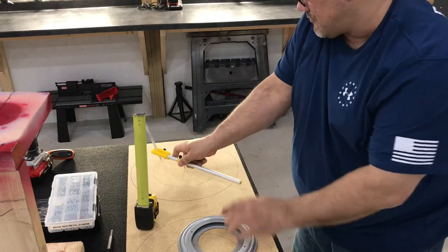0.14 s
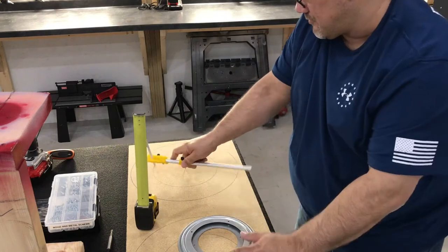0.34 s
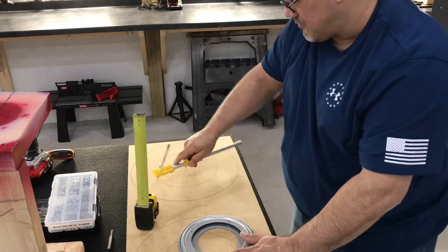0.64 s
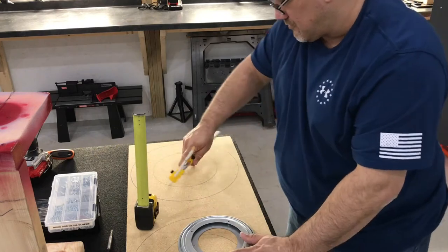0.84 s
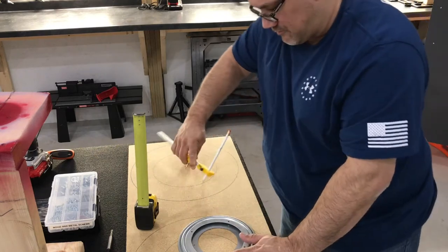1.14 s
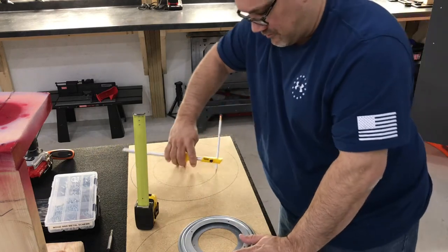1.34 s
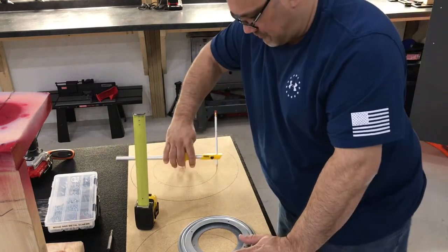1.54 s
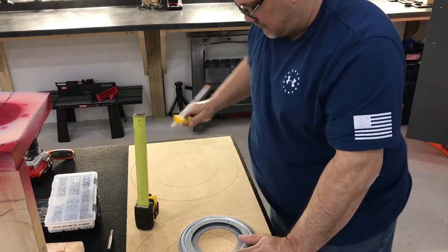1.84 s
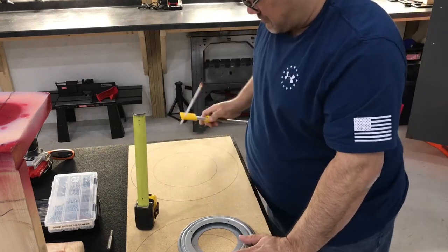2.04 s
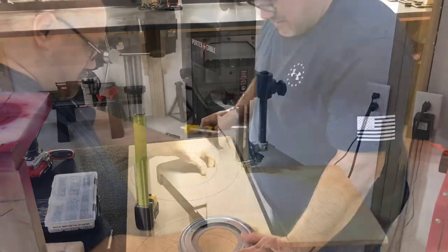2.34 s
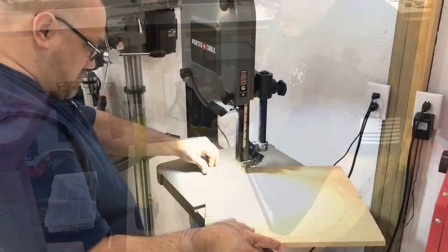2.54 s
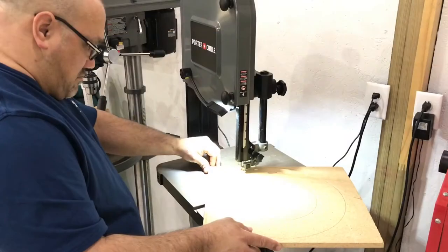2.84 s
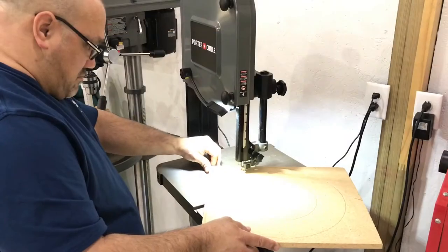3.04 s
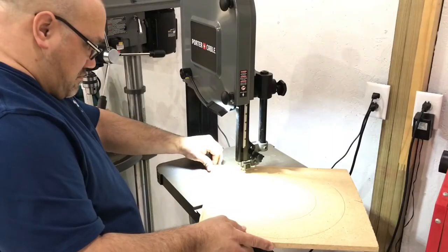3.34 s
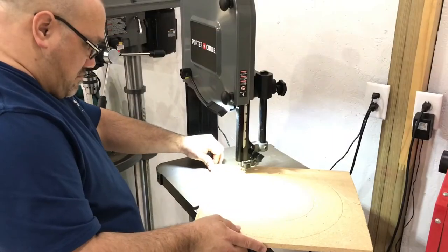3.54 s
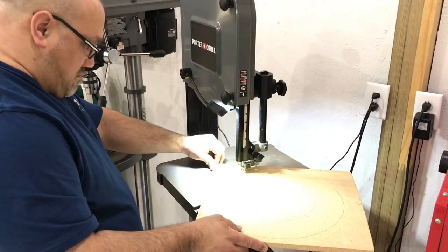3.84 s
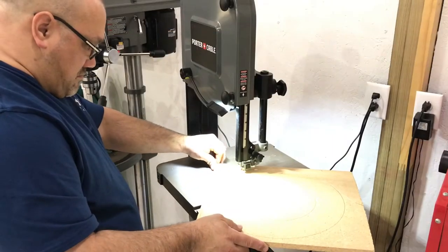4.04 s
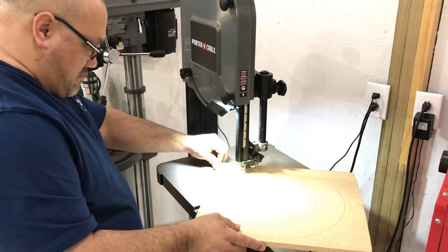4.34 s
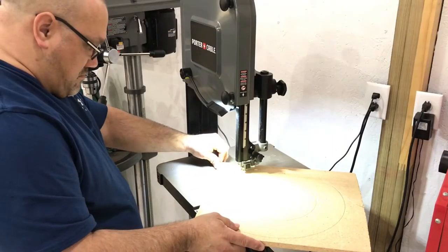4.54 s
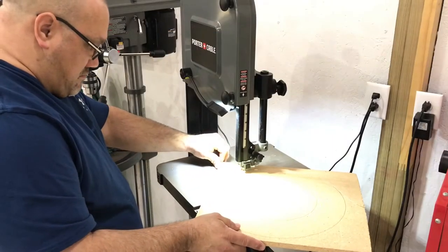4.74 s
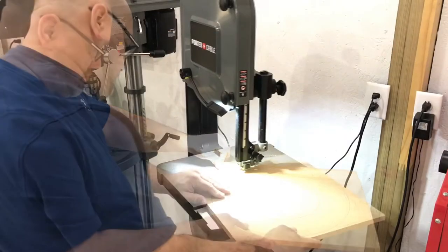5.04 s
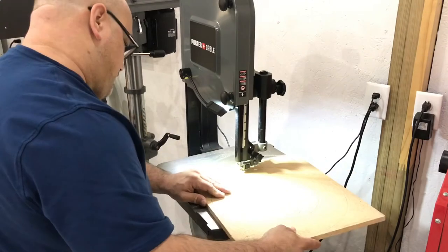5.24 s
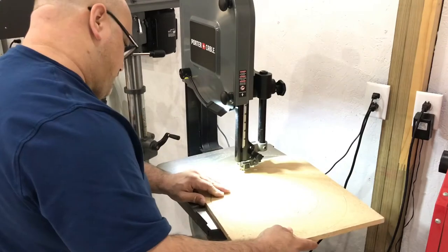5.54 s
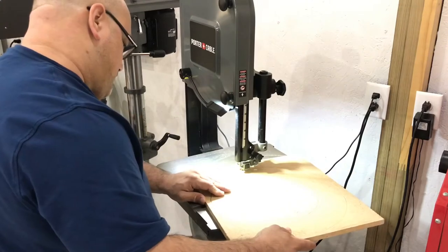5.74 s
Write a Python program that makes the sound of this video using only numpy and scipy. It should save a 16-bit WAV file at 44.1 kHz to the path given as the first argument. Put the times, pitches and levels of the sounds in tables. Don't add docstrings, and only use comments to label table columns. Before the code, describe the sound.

Faint pencil scratching on plywood over soft room rumble, then a loud band saw fades in, humming, whining and hissing steadily through a board.

```python
import sys
import numpy as np
from scipy import signal
from scipy.fft import rfft, irfft
from scipy.io import wavfile

SR = 44100
rng = np.random.default_rng(int(sys.argv[2]) if len(sys.argv) > 2 else 0)


def pcm_store(signal):
    levels = np.round(np.clip(np.atleast_2d(signal), -1, 1) * 32767)
    wavfile.write(sys.argv[1], SR, levels.astype(np.int16).T)


def ratio(d):
    e = np.asarray(d, float) / 20
    return 10 ** e


N = 259308
BELT_HZ = 335.05


def rms_one(x):
    return x / np.sqrt(np.mean(x ** 2) + 1e-20)


def in_time(rows):
    s, *columns = np.transpose(rows)
    return [np.interp(np.arange(N) / SR, s, c) for c in columns]


def swells(rows):
    t = np.arange(0, N + 64, 64) / SR
    s, length, *columns = np.transpose(rows)
    bells = np.exp(-0.5 * ((t[:, None] - s) / length) ** 2)
    return [np.interp(np.arange(N) / SR, t, bells @ c) for c in columns]


def drift(rate):
    thin = 40
    r = np.exp(-2 * thin * np.pi * rate / SR)
    noise = rng.standard_normal(N // thin + 2002)
    slow = signal.lfilter([1], [1, -2 * r, r * r], noise)[2000:]
    return np.interp(np.arange(N) / thin, np.arange(len(slow)), rms_one(slow))


def coloured(x, spectrum):
    hz, db = np.transpose(sorted(spectrum))
    grid = np.maximum(np.arange(N // 2 + 1) * SR / N, 1)
    gain = ratio(np.interp(np.log(grid), np.log(hz), db))
    return rms_one(irfft(rfft(x) * gain, N))


def resonate(x, modes):
    out = np.zeros(N)
    for k, (hz, width, db) in enumerate(modes):
        r = np.exp(-np.pi * width / SR)
        poles = [1, -2 * r * np.cos(2 * np.pi * hz / SR), r * r]
        ring = signal.lfilter([1, 0, -1], poles, x)
        out += (-1) ** k * ratio(db) * rms_one(ring)
    return out


def stack(turns, orders, flutter_db, rate, smear):
    out = np.zeros(N)
    for k, db in orders:
        level = ratio(db + flutter_db * drift(rate))
        wander = smear * np.sqrt(k) * drift(rate)
        out += level * np.sin(2 * np.pi * (k * turns + rng.random()) + wander)
    return out * np.sqrt(2)


def keep_band(x, low_hz, high_hz):
    size = x.shape[-1]
    grid = np.arange(size // 2 + 1) * SR / size
    return irfft(rfft(x) * (grid >= low_hz) * (grid <= high_hz), size)


def shop():
    # frequency in Hz, level in dB per Hz.
    air_colour = [(18, -46), (30, -33), (69, -7.0), (144, -12.5), (173, -8.5), (270, -7.0), (333, -13.0),
                  (370, -13.5), (433, -21.5), (1170, -28.5), (1400, -28), (15600, -66), (9300, -51.0),
                  (10400, -61), (11500, -55)]
    # frequency in Hz, width in Hz, level in dB.
    room_modes = [(70, 30, -7), (142, 10, -8), (219, 6, -6), (268, 8, -11), (292, 8, -11), (367, 10, -15),
                  (452, 12, -20), (1020, 25, -22)]
    # time in seconds, level in dB.
    room_level = [
        (0.0, -35.5),
        (0.9, -35.5),
        (1.33, -34.5),
        (1.7, -36.5),
        (2.2, -35.5),
    ]
    air = coloured(rng.standard_normal(N), air_colour)
    air = air + resonate(rng.standard_normal(N), room_modes)
    return ratio(in_time(room_level)[0] + 0.27 * drift(1.5)) * rms_one(air)


def compass_tick():
    # time in seconds, peak level in dB.
    ticks = [
        (0.6085, -47),
    ]
    clicks = np.zeros(N)
    for s, db in ticks:
        clicks[round(s * SR)] = ratio(db - 8)
    decay = signal.lfilter([1], [1, -np.exp(-1 / (0.0027 * SR))], clicks)
    return decay * rng.standard_normal(N)


def compass():
    # time in seconds, pencil pressure in dB, lead resonance in Hz.
    swing = [
        (0.0, -83, 6200),
        (0.25, -75.5, 6500),
        (0.8, -71, 6600),
        (1.12, -71, 6900),
        (1.42, -72, 6500),
        (1.44, -77, 6360),
        (1.65, -80.5, 6350),
        (2.2, -83, 6250),
    ]
    # time in seconds, length in seconds,
    # then the gain in dB of lead, of low beam mode, of upper beam modes.
    pushes = [
        (0.12, .03, 0, 3, 3),
        (0.29, .04, 6, 0, 2),
        (0.43, .04, 7, 14, 7.3),
        (0.6, .05, 3, 7, 3),
        (0.69, .03, 9, 6, 4),
        (0.79, .03, 2, 6, 4),
        (1.02, .04, 2, 5, 5),
        (1.12, .05, 2, 3, 5),
        (1.39, .04, 4, 7, 3),
    ]
    # frequency in Hz, width in Hz, level in dB.
    beam_groups = [
        [(4140, 300, 10)],
        [(9900, 390, -1), (12000, 900, 2), (13300, 700, 2)],
        [(15000, 700, 3)],
    ]
    beam_rest = (-6, -4, -8)
    level_db, lead_hz = in_time(swing)
    lead_db, low_db, upper_db = swells(pushes)
    grain = rng.standard_normal(N) * ratio(1.5 * drift(40))
    band = signal.sosfilt(signal.butter(2, 350, fs=SR, output="sos"), rng.standard_normal(N))
    lead_turns = np.cumsum(lead_hz + 100 * drift(5.4)) / SR
    lead = rms_one(band * np.sin(2 * np.pi * lead_turns))
    beam = np.zeros(N)
    for rest, push, group in zip(beam_rest, (low_db, upper_db, upper_db), beam_groups):
        for mode in group:
            beam += ratio(rest + push + 2 * drift(5.5)) * resonate(grain, [mode])
    return ratio(level_db) * (ratio(3.0 + lead_db) * lead + beam) + compass_tick()


def chip_hiss(cut, chips):
    # frequency in Hz, level in dB per Hz.
    rumble = [(25, -54), (50, -40), (100, -41), (150, -45), (280, -12)]
    # frequency in Hz, level in dB per Hz.
    hiss = [
        [(240, -47), (400, -11), (663, -12), (822, -12.5), (1000, -6), (1240, -6), (1640, -13.5), (3170, -9),
         (3370, -6.5), (3930, -7), (4510, -7.5), (6700, -8.5), (7590, -11.5), (12400, -16), (15600, -14.5)],
        [(240, -46), (400, -5), (605, -5), (663, -10.5), (848, -1.5), (1000, -3), (1080, 0), (1690, -1),
         (2160, 3), (3170, -4.5), (3370, 4), (3640, -3), (6400, -1.5), (7400, -5.5), (10000, -8.5),
         (15600, -12)],
    ]
    hiss_db = (-5, -5)
    return ratio(hiss_db[cut]) * coloured(chips, rumble + hiss[cut][1:])


def blade_and_board(cut, chips):
    # frequency in Hz, width in Hz, level in dB.
    body = [
        [(120, 9, -29), (158, 25, -23), (215, 9, -28), (455, 7, -38), (885, 8, -32), (1460, 4, -23.5),
         (1556, 10, -23), (1670, 140, -14), (1860, 200, -20), (2080, 100, -23), (2500, 200, -20),
         (3000, 300, -16), (3720, 70, -24), (4830, 30, -29), (5195, 30, -25), (5800, 150, -23), (8650, 60, -25),
         (11500, 250, -26), (12700, 500, -23)],
        [(150, 30, -22), (215, 12, -30), (1670, 120, -16), (3000, 300, -16), (3590, 20, -25), (4140, 20, -28),
         (12600, 300, -24)],
    ]
    return sum(ratio(0.46 * drift(5.4)) * resonate(chips, [mode]) for mode in body[cut])


def guard_whine(chips):
    # frequency in Hz, width in Hz, level in dB.
    side_strands = [(3315, 14, -9), (3378, 14, -11), (3408, 25, -12)]
    # time in seconds, length in seconds, gain in dB, pull in Hz.
    flares = [(2.75, 0.028, 9, -35), (2.86, 0.031, 14, -1), (2.93, 0.0308, 10, -39), (3.07, 0.015, 12, 9),
              (3.46, 0.032, 15.5, -41), (3.55, 0.037, 1, 38), (3.63, .03, 13, 0), (3.7, .025, 10, -23.5),
              (3.79, .025, 17, -24.5), (3.87, .02, 15, -26), (4.05, 0.022, 10.5, -3), (4.11, .03, 12, 2.5),
              (4.24, 0.014, 11, -13), (4.42, 0.027, 13, -8.5), (4.6, 0.029, 8, -29), (4.9, 0.063, 2, -2.5),
              (5.44, 0.029, 6, 25), (5.55, .02, 5, 1.5)]
    flare_db, pull_hz = swells(flares)
    turns = np.cumsum(3350 + pull_hz + 6 * drift(6)) / SR
    strand = stack(turns, [(1, -3)], flutter_db=2.5, rate=20, smear=0.5)
    return ratio(-17 + flare_db) * (strand + resonate(chips, side_strands))


def blade_teeth(cut, turns):
    tooth_rest = [
        (-18, -17.5, -16.5, -19),
        (-20.5, -18, -14.5, -21.5),
    ]
    # time in seconds, length in seconds, gain in dB.
    low_swells = [
        [(2.74, 0.074, 10), (2.85, 0.029, 5), (3.02, 0.033, 7), (3.18, 0.022, 4), (3.39, .025, 6.5),
         (3.55, 0.034, 6), (3.88, 0.08, 8), (4.38, .05, 8), (4.72, 0.022, 6), (4.86, 0.015, 7),
         (5.68, 0.028, 8)],
        [(2.75, .05, 3.5), (3.02, 0.024, 1), (3.6, .05, 4), (3.86, .04, 7), (4.2, 0.03, 7), (4.39, 0.028, 3),
         (4.7, .025, 8), (5.4, 0.036, 1), (5.58, 0.063, 3.5), (5.85, .03, 6)],
    ]
    # time in seconds, length in seconds, gain in dB.
    high_swells = [
        [(2.75, 0.059, 8), (2.9, 0.05, 4), (3.66, .06, 7), (3.93, 0.045, 5), (4.4, .1, 6), (4.89, 0.035, 9.5),
         (5.27, .03, 8.5), (5.46, 0.047, 7.5), (5.85, 0.027, 14.5)],
        [(2.45, 0.042, 6), (2.75, .03, 7), (2.89, 0.053, 6), (3.28, 0.085, 9), (4.0, .03, 10), (4.1, .025, 7),
         (4.34, 0.026, 6), (4.59, .02, 2), (4.9, 0.031, 1)],
    ]
    # multiple of the tooth rate, level in dB.
    upper_orders = [
        [(5, -41), (6, -35), (7, -42), (8, -43), (9, -46), (10, -43), (11, -46), (12, -49), (13, -49)],
        [(2.5, -41), (3.5, -39), (4.5, -32.5), (5, -38), (6, -31.5), (7, -36.5), (7.5, -44), (8, -36.5),
         (9, -48), (10, -37), (11, -40), (12, -44), (13, -39)],
    ]
    # time in seconds, gain in dB.
    bite = [
        [(0, 0), (5.88, 0)],
        [(5.2, -7), (5.27, 0)],
    ]
    low = np.zeros(N)
    for k, (rest, rows) in enumerate(zip(tooth_rest[cut], low_swells + high_swells)):
        level = ratio(rest + swells(rows)[0])
        low += level * stack(turns, [(k + 1, 0)], flutter_db=2.8, rate=22, smear=0.25)
    upper = stack(turns, upper_orders[cut], flutter_db=3, rate=18, smear=0.38)
    return low + upper * ratio(15 + in_time(bite[cut])[0])


def belt_overtones(cut):
    # multiple of the belt rate, level in dB.
    overtones = [
        [(2, -39.5), (3, -30), (4, -36), (5, -37), (6, -32), (7, -44), (8, -35.5), (9, -33.5), (10, -31),
         (11, -45), (13, -44), (16, -45), (18, -44), (25, -49), (30, -52), (36, -44)],
        [(2, -39), (3, -31), (4, -38), (5, -32), (6, -34.5), (7, -39), (8, -40), (9, -33.5), (10, -36),
         (12, -42), (13, -46), (14, -45), (16, -45), (26, -48), (36, -45)],
    ]
    turns = BELT_HZ * np.arange(N) / SR
    return stack(turns, overtones[cut], flutter_db=1.5, rate=5, smear=0.1) * ratio(15.5)


def belt_hum():
    # time in seconds, level in dB.
    belt_level = [
        (2.7, -19),
        (3.63, -19.5),
        (4.86, -21.5),
        (5.13, -18),
        (5.32, -17),
        (5.79, -17),
        (5.88, -17.5),
    ]
    turns = BELT_HZ * np.arange(N) / SR
    hum = stack(turns, [(1, 0)], flutter_db=0.35, rate=8, smear=0.04)
    return hum * ratio(in_time(belt_level)[0])


def saw(cut):
    # time in seconds, cutting noise in dB.
    feed = [
        (2.2, -15),
        (2.71, -14.5),
        (3.1, -15),
        (3.9, -15),
        (4.8, -15),
        (5.05, -17.5),
        (5.2, -15.5),
        (5.45, -14.5),
        (5.88, -14),
    ]
    tooth_rate = (1155, 1143.5)
    noise_db, = in_time(feed)
    turns = np.cumsum(tooth_rate[cut] * (1 + 0.0013 * drift(8))) / SR
    bursts = 1 + 0.18 * np.sin(2 * np.pi * turns)
    chips = rng.standard_normal(N) * bursts * ratio(0.5 * drift(21))
    tones = belt_overtones(cut) + blade_teeth(cut, turns) + guard_whine(chips)
    noise = blade_and_board(cut, chips) + chip_hiss(cut, chips)
    return ratio(noise_db) * (tones + noise)


def scene():
    # time in seconds, share (0-1) of quiet shop, of first cut, of later cut.
    shots = [
        (0, 1, 0, 0),
        (2.2, 1, 0, 0),
        (2.71, 0, 1, 0),
        (4.75, 0, 1, 0),
        (5.27, 0, 0, 1),
        (5.88, 0, 0, 1),
    ]
    quiet, first, later = in_time(shots)
    even = np.sqrt(first ** 2 + later ** 2 + 1e-9)
    cutting = belt_hum() + (first * saw(0) + later * saw(1)) / even
    mono = quiet * (shop() + compass()) + (1 - quiet) * cutting
    return np.array([mono, mono])


def roll_off(x):
    return signal.sosfilt(signal.butter(12, 16740, fs=SR, output="sos"), x)


def record(dry):
    # time in seconds, low edge in Hz, high edge in Hz.
    wide_moments = [(.53, 4300, 5200), (.53, 8300, 9600), (.53, 13800, 15000), (1.08, 7600, 8900),
                    (1.08, 11700, 13100), (1.155, 9600, 11000), (1.155, 11700, 13100),
                    (1.155, 14400, 15700), (2.5, 13700, 15100), (2.525, 14400, 15700), (2.55, 7600, 10300),
                    (2.685, 4200, 5800), (2.685, 6200, 7600), (2.94, 4200, 5200), (3.035, 11000, 12400),
                    (3.265, 11000, 13100), (3.66, 10300, 11700), (3.755, 4600, 5800), (4.38, 11000, 12400),
                    (4.54, 14400, 15700), (4.705, 7600, 9000), (4.705, 10300, 12400), (4.705, 14400, 15700),
                    (4.755, 4600, 5800), (4.94, 10300, 11700), (4.96, 4200, 6900), (4.96, 11000, 12400),
                    (4.985, 4200, 5200), (4.985, 12400, 13800), (5.31, 5200, 6900)]
    top_hz = 15700
    cut = signal.sosfilt(signal.butter(2, 45, "high", fs=SR, output="sos"), dry)
    cut = signal.sosfilt(signal.ellip(14, 1, 80, top_hz, fs=SR, output="sos"), cut)
    cut = signal.sosfilt(signal.butter(10, top_hz, fs=SR, output="sos"), cut)
    side, frame = np.zeros(N), np.hanning(2048)
    for s, low_hz, high_hz in wide_moments:
        at = round(s * SR) - len(frame) // 2
        earlier = cut[0, at - len(frame):at]
        side[at:at + len(frame)] += ratio(-2.8) * frame * keep_band(earlier, low_hz, high_hz)
    return roll_off(cut + side * [[1], [-1]])


dry = scene()
out = record(dry)
pcm_store(out)
```